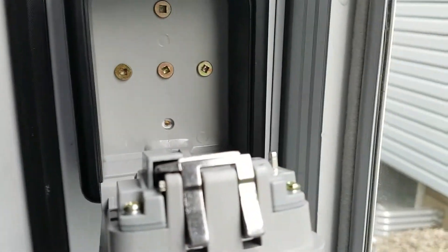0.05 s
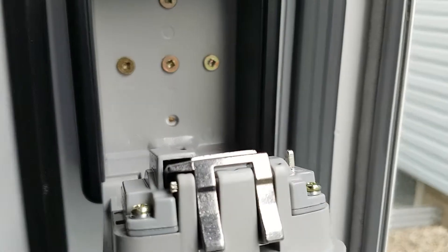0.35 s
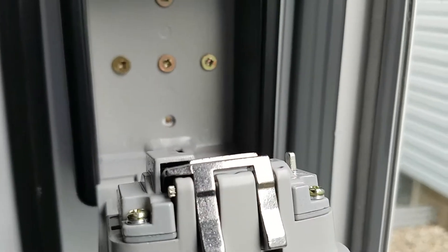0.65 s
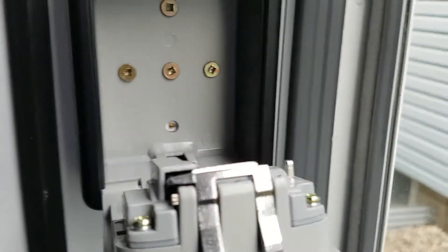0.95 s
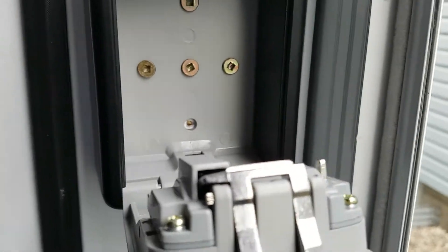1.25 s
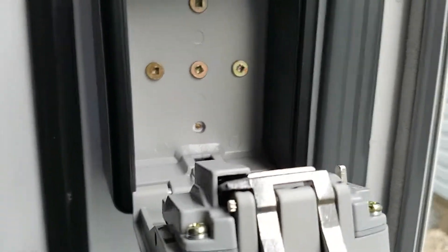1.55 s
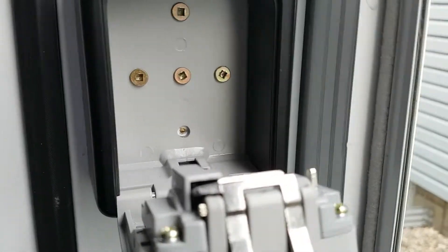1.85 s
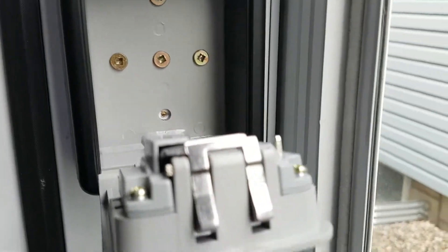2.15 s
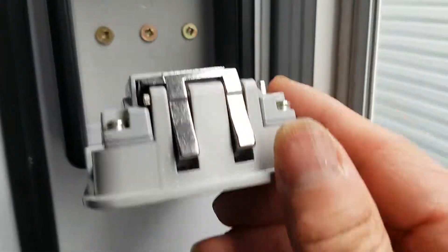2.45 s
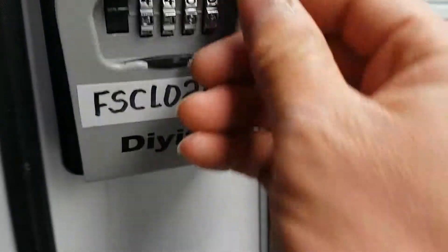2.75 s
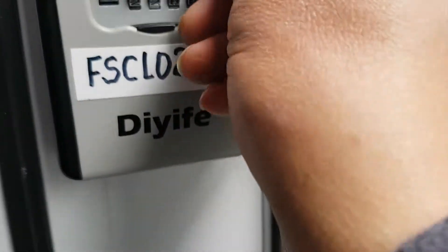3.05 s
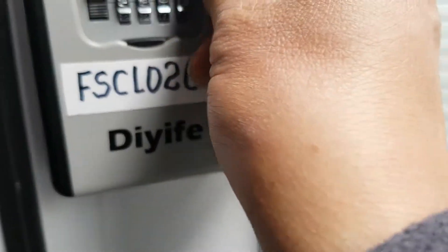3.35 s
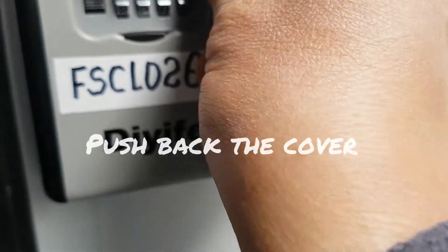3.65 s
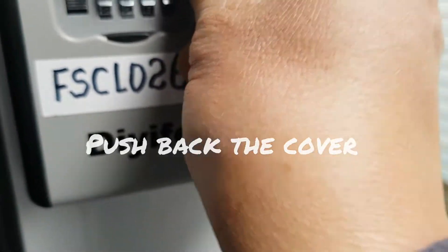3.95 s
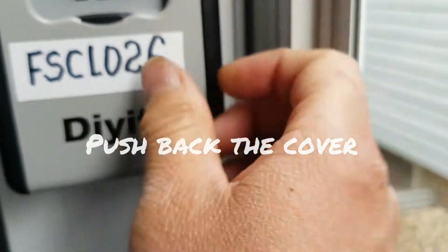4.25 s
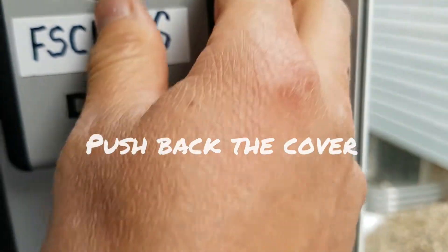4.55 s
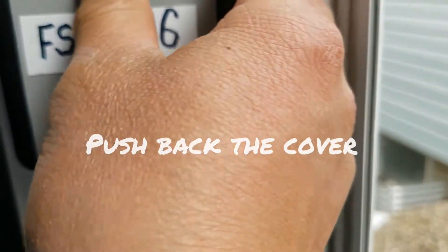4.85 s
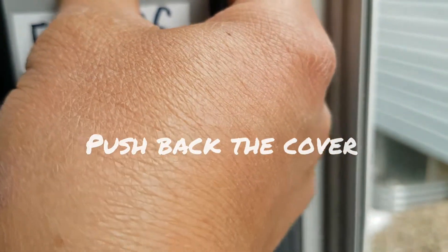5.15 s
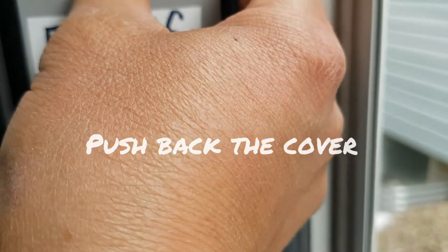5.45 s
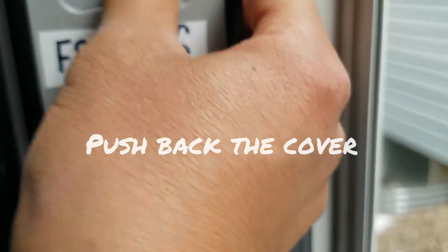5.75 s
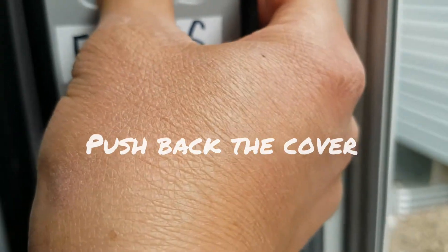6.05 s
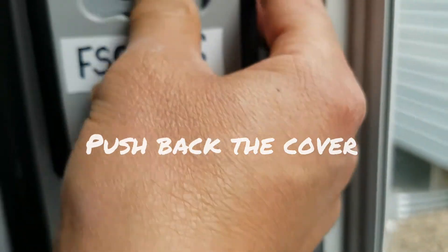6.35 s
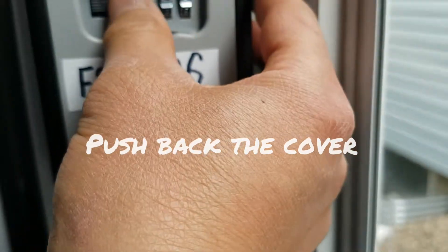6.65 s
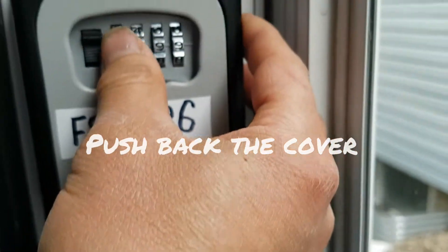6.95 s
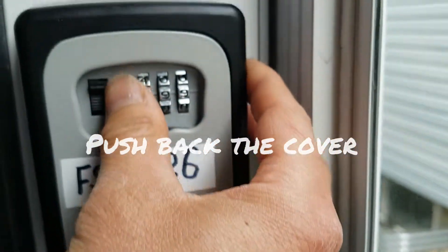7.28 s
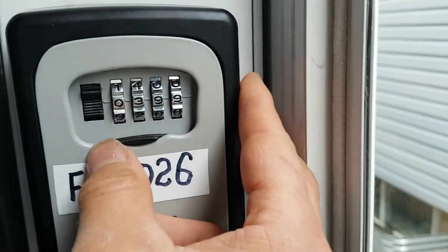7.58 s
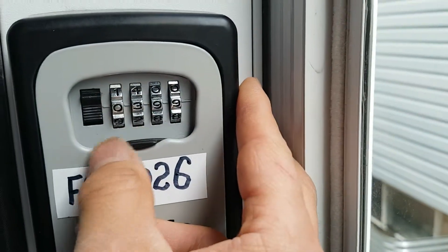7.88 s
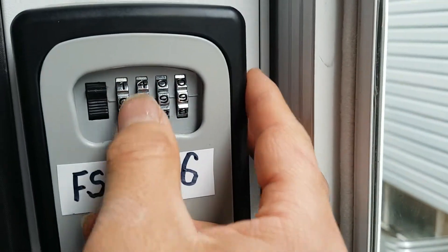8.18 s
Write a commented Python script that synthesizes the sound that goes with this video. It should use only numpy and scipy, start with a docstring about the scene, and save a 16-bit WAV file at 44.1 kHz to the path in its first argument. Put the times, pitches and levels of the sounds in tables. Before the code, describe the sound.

Light knocks and thin hinge squeaks lead to a metal lockbox lid snapping shut, followed by small, uneven dial clicks.

```python
"""You hear the lid of a small metal key safe squeak open and snap shut, then a number dial click round.
The dry hinge sticks and slips. Each contact of lid or dial is a quick chatter of tiny impacts that
makes the metal ring, and the room echoes it. The lid shuts with a low boom. Close by, skin rubs, a sleeve
rustles and a finger bumps the camera, over a low rumble. A few faint whistles come and go."""
import sys
import numpy as np
from scipy import signal
from scipy.fft import rfft, irfft
from scipy.io import wavfile

SR = 44100
rng = np.random.default_rng(int(sys.argv[2]) if len(sys.argv) > 2 else 0)


def generate_wav(sig):
    """Save sig (samples, or channels by samples) to the path in sys.argv[1] as 16-bit PCM at SR."""
    pcm = np.round(np.clip(np.atleast_2d(sig).T, -1, 1) * 32767).astype(np.int16)
    wavfile.write(sys.argv[1], SR, pcm)


N = 362502
TIME = np.arange(N) / SR
TOP_HZ = 15950  # upper edge of the sound

# Low thuds: soft bumps on the camera, and a low boom as the lid snaps shut.
# (time [s], level [dB], push length [s], wobble pitch [Hz], wobble fade time [s])
# A fade time, here and below, is the time to drop by 60 dB.
LOW_THUDS = [(1.496, -35, 0.005, 123, 0.086), (2.745, -38, 0.0088, 84, .1), (2.799, -38, 0.014, 55, 0.073),
             (3.287, -37, 0.0098, 73.7, 0.088), (3.548, -37, 0.01, 65.6, 0.59),
             (4.2752, -25.5, 0.0043, 76.4, 0.22), (4.312, -28, 0.01, 70, 0.21),
             (4.353, -26, 0.0044, 100, 0.032), (4.412, -30, 0.0054, 104, 0.095),
             (4.488, -36.5, 0.0055, 69.4, 0.3), (4.57, -41.5, 0.0042, 102, 0.16)]
# How alike left and right are for sound from all around: (frequency [Hz], likeness [1 = the same])
AIR_LIKENESS_CURVE = [(60, 0.92), (130, 1), (290, 0.97), (640, 0.55), (1410, 0.23), (3100, 0.0039),
                      (6820, -0.03), (15000, -0.015)]


def amp(db):
    """Turns decibels into a number to multiply by."""
    return 10 ** (np.asarray(db) / 20)


def unit(x):
    """Scales a signal to an average power of 1."""
    return x / np.sqrt(np.mean(x ** 2) + 1e-20)


def per_blow(x):
    """Scales a stereo sound to the energy of 10 ms at power 1."""
    return x / np.sqrt(np.sum(x ** 2) / len(x) / (.01 * SR) + 1e-20)


def read(points, hz):
    """Reads between (frequency [Hz], value) points, with octaves evenly spaced."""
    f, value = np.transpose(points)
    return np.interp(np.log(hz + 1), np.log(f + 1), value)


def add(mix, s, sound):
    """Mixes a sound in, starting at s seconds."""
    part = mix[:, max(round(s * SR), 0):][:, :sound.shape[1]]
    part += sound[:, :part.shape[1]]


def colour(x, points):
    """Shapes the tone with a (frequency [Hz], level [dB]) curve."""
    size = x.shape[-1]
    return irfft(rfft(x) * amp(read(points, np.fft.rfftfreq(size, 1 / SR))), size)


def pair(x, likeness):
    """Makes two unrelated channels alike in the low notes, where the waves are long."""
    size = x.shape[-1]
    left, other = rfft(x)
    same = np.clip(read(likeness, np.fft.rfftfreq(size, 1 / SR)), -1, 1)
    return irfft(np.array([left, same * left + np.sqrt(1 - same ** 2) * other]), size)


def drift(per_s):
    """A random wavering, with up to about per_s ups and downs a second."""
    knots = np.arange(0, TIME[-1] + 1, .5 / per_s)
    return unit(np.interp(TIME, knots, rng.standard_normal(4096)[:len(knots)]))


def movement(shake_db=-15, shake_fade_s=.9):
    """Levels of rumble, rub and sleeve: each move swells and fades, each thud stirs up the rumble."""
    # noise between moves: (time [s], rub level [dB], sleeve level [dB])
    quiet = [(0, -62, -66.5), (2.5, -65, -63.5), (3.45, -60.5, -68.5), (5.3, -62, -69.5), (6.0, -64, -71.5),
             (6.8, -64, -72.5), (8.2, -62.5, -73)]
    # rumble at rest: (time [s], level [dB])
    resting_rumble = [(0, -55.5), (2.0, -56), (5.2, -53.5), (6.8, -56), (8.2, -55)]
    # moves of hand and arm: (peak time [s], half length [s], rub level [dB], sleeve level [dB])
    moves = [(0.035, 0.21, -59, -59.5), (0.464, 0.29, -59, -59), (0.807, 0.1, -55.5, -53.5),
             (1.03, 0.07, -55, -56), (1.228, 0.12, -56, -57), (1.503, .14, -50.5, -51),
             (1.906, 0.25, -55.5, -54), (2.149, 0.24, -55.5, -52), (2.326, 0.2, -57, -63),
             (2.87, 0.31, -57.5, -57.5), (4.199, 0.16, -56, -55.5), (4.498, 0.3, -62.5, -64.5),
             (4.992, 0.16, -67, -64)]
    times, *levels = np.transpose(quiet)
    rub, sleeve = (amp(np.interp(TIME, times, db)) ** 2 for db in levels)  # noises add as powers
    rumble = amp(np.interp(TIME, *np.transpose(resting_rumble))) ** 2
    for s, half_length, rub_db, sleeve_db in moves:
        swell = np.exp(-2 * ((TIME - s) / half_length) ** 2)
        rub += amp(rub_db) ** 2 * swell
        sleeve += amp(sleeve_db) ** 2 * swell
    for s, db, *_ in LOW_THUDS:
        rumble += (TIME > s) * amp(db + shake_db - 60 * abs(TIME - s) / shake_fade_s) ** 2
    return np.sqrt([rumble, rub, sleeve])


def rumble_and_rustle():
    """A low rumble, skin rubbing on the case and the grainy hiss of a sleeve."""
    # tone of each noise: (frequency [Hz], relative level [dB])
    rumble_tone = [(15, -50), (25, -13), (59, -10), (76, -3), (96, -2), (137, 1), (171, -12), (197, -8.5),
                   (227, -15.5), (420, -26), (550, -52), (920, -120)]
    rub_tone = [(150, -34.5), (250, 1.5), (391, -7.5), (443, -5), (508, -9.5), (914, -7), (1000, -10),
                (1260, -9), (2780, -12.5), (3960, -21.5), (6390, -31), (7230, -31.5), (10000, -39.5),
                (13000, -31.5), (22000, -120)]
    sleeve_tone = [(1500, -9), (3500, -6), (5500, -4.5), (7500, -9), (9500, -9), (11500, -3), (14000, -2.5),
                   (16000, -2.5)]
    rumble_level, rub_level, sleeve_level = movement()
    low, mid, high = (pair(rng.standard_normal((2, N)), AIR_LIKENESS_CURVE) for _ in range(3))
    rumble = unit(colour(low, rumble_tone)) * rumble_level * amp(1.5 * drift(12)) * amp([[-.6], [.6]])
    rub = unit(colour(mid, rub_tone)) * rub_level * amp(drift(40))
    fibres = high * np.exp(.35 * rng.standard_normal(N))
    sleeve = unit(colour(fibres, sleeve_tone)) * sleeve_level * amp(.9 * drift(54))
    return rumble + rub + sleeve * amp([[1.8], [-2.2]])  # the sleeve is a little to the left


def chatter(t, length, rise_s, release_s, grit):
    """Tiny impacts as two parts slide into place; more grit makes their sizes more uneven."""
    # how alike left and right are for sound straight from the box: (frequency [Hz], likeness [1 = same])
    box_likeness = [(200, 0.96), (700, 1), (1300, 0.97), (2500, 0.094), (15000, 0.029)]
    pressure = (1 - np.exp(-t / rise_s)) * np.exp(-np.maximum(t - length, 0) / release_s)
    impacts = rng.standard_normal((2, len(t))) * np.exp(grit * rng.standard_normal(len(t)))
    impacts = pair(impacts, box_likeness) * pressure
    even = irfft(np.exp(1j * np.angle(rfft(impacts))))  # every frequency equally strong
    return per_blow(even * np.sqrt(pressure))


def hinge(width_hz=200, scrape_db=-4, linger_db=-22, linger_width_hz=22):
    """The dry hinge sticks and slips, ringing one very high note with a puff of scraping noise."""
    # catches of the hinge: (time [s], length [s], pitch [Hz], relative level [dB])
    squeaks = [(0.016, 0.0075, 13840, -39), (0.543, 0.0046, 13400, -48), (1.007, 0.0032, 13400, -45.5),
               (1.032, 0.007, 13800, -46.5), (1.233, 0.0025, 13600, -48.5), (1.578, 0.019, 12100, -34.5),
               (1.746, 0.0073, 13200, -45), (1.938, 0.0059, 13140, -36.5), (2.053, 0.016, 13800, -44),
               (2.103, 0.021, 13400, -34.5), (2.13, 0.013, 13600, -31), (2.15, 0.0049, 13500, -39)]
    out, t = np.zeros((2, N)), np.arange(4096) / SR
    for s, length, hz, db in squeaks:
        slips = chatter(t, length, rise_s=0.0012, release_s=0.0013, grit=0.65)
        decay = np.exp(-np.pi * width_hz * t) + amp(linger_db) * np.exp(-np.pi * linger_width_hz * t)
        note = decay * np.sin(2 * np.pi * hz * t)
        squeal = per_blow(signal.fftconvolve(slips, note[None], axes=1)[:, :len(t)])
        scrape = per_blow(band(slips, 12940, 14100, order=1))
        add(out, s, amp(db) * (squeal + amp(scrape_db) * scrape))
    return out * amp([[2.6], [-7.5]])  # louder on the left


def band(x, lo_hz, hi_hz, order=3):
    """Keeps the frequencies between lo_hz and hi_hz."""
    return signal.sosfilt(signal.butter(order, (lo_hz, hi_hz), "band", fs=SR, output="sos"), x)


def room(x, build_s=0.004):
    """Echoes from the walls blur into a tail whose highest notes die first."""
    # how long the room rings: (frequency [Hz], fade time [s])
    fade_times = [(200, 0.5), (700, 1.13), (2000, 0.65), (5000, 0.74), (9000, 0.67), (15500, 0.18)]
    # tone of the echo: (frequency [Hz], relative level [dB])
    echo_tone = [(200, 8), (700, -4), (2000, 0), (5000, -2.5), (9000, -6), (15500, -3.5)]
    hz, t, spectrum = signal.stft(rng.standard_normal((2, SR + SR // 4)), SR, nperseg=256)
    spectrum *= amp(read(echo_tone, hz)[:, None] - 60 * t / read(fade_times, hz)[:, None])
    tail = pair(signal.istft(spectrum, SR, nperseg=256)[1], AIR_LIKENESS_CURVE)
    tail *= 1 - np.exp(-TIME[:tail.shape[1]] / build_s)
    return signal.fftconvolve(x, tail / np.linalg.norm(tail[0]), axes=1)[:, :N]


def ring(force, notes, spot, extra_width_hz, between_db):
    """A force rings a part's own notes (wider ones die sooner); the struck spot boosts some pitches."""
    size = force.shape[1]
    f = np.fft.rfftfreq(size, 1 / SR)
    hz, width, db = np.transpose(notes)[:, :, None]
    width = width + extra_width_hz * (1 + hz / 2500)  # the hand damps high notes most
    peaks = amp(db) ** 2 / (1 + (2 * (f - hz) / width) ** 2)
    power = amp(between_db) ** 2 + peaks.sum(0)
    for spot_hz, sharpness, lift_db in spot:
        boost = np.interp(spot_hz, f, power) * amp(lift_db) ** 2
        power += boost / (1 + (2 * sharpness * (f / spot_hz - 1)) ** 2)
    cepstrum = irfft(np.log(power)) * (np.arange(size) < size // 2)  # puts the ring after the blow
    return irfft(rfft(force) * np.exp(rfft(cepstrum)))


def knocks(contacts, notes, extra_width_hz, low_db, high_db, between_db, settle_db, rise_s, hard_hz):
    """Each contact is a chatter that rings its part, with its own mix of thud, body, clack and click."""
    # ranges of thud, body, clack and click: (low edge [Hz], high edge [Hz])
    ranges = [(160, 500), (500, 1100), (1100, 3500), (3500, 16000)]
    # how much louder the box is on the left: (frequency [Hz], left minus right [dB])
    box_lean = [(200, 0.5), (400, -1.5), (700, -4), (1100, 4.5), (2300, 7.5), (4400, 3), (15000, 1)]
    lean = np.array(box_lean)
    out, t = np.zeros((2, N)), np.arange(4096) / SR
    for s, length, db, thud_db, clack_db, click_db, low_hz, high_hz in contacts:
        strike = chatter(t, length, rise_s, release_s=0.0029, grit=0.27)
        settle = chatter(t, length, rise_s=0.013, release_s=0.012, grit=0.76)  # loose parts settle
        spot = [(low_hz, 13, low_db), (high_hz, 16, high_db)]
        ringing = ring(strike + amp(settle_db) * settle, notes, spot, extra_width_hz, between_db)
        reach_hz = min(hard_hz * 2 ** (click_db / 29), TOP_HZ)  # harder contacts reach higher
        ringing = band(ringing, 100, reach_hz, order=2)
        shares = zip((thud_db, 0, clack_db, click_db), ranges)
        blow = sum(amp(db + share) * per_blow(band(ringing, *edges)) for share, edges in shares)
        add(out, s, np.array([colour(blow[0], lean * [1, .5]), colour(blow[1], lean * [1, -.5])]))
    return out


def lid():
    """The lid and its latch knock against the box, ringing it and its wall plate."""
    # contacts: (time [s], chatter length [s], body level [dB], thud, clack and click [dB above body],
    # low and high note of the struck spot [Hz])
    contacts = [(0.438, 0.014, -50, -2.5, -3, -3, 300, 11090),
                (1.201, 0.0077, -54, 5.5, 8, -13, 1260, 2250),
                (1.351, 0.026, -48.5, -3, 0.5, -7, 1440, 2340), (1.388, 0.009, -54, 8, 0, 9.5, 430, 4270),
                (1.44, 0.037, -45.5, -0.5, 0, -4.5, 400, 11670),
                (1.487, 0.029, -57, 8.5, 4, 10, 460, 12400), (1.583, 0.019, -58, 5.5, 14, 13, 2300, 6750),
                (2.132, 0.019, -69.5, -3, 21, 19, 2040, 11200),
                (2.417, 0.015, -58, 18.5, -17, -10, 250, 344), (2.44, 0.008, -46, -2, -10, -20, 237, 668),
                (2.697, 0.012, -40, -3, -9, -18.5, 330, 730),
                (2.726, 0.036, -49, 7.5, -7.5, -21.5, 242, 883),
                (2.97, 0.011, -34, -4.5, 2.5, -2, 1263, 7950),
                (3.391, 0.0085, -48.5, -1, -23, -24.5, 510, 711),
                (3.5321, 0.0084, -29, -17, 5.5, -7.5, 800, 2560),
                (3.5368, 0.008, -18, -15.5, -3, -2.5, 790, 1780),
                (3.97, 0.0057, -30, -6, -3.5, -15, 692, 2030), (4.021, 0.0027, -55.5, 5, -5, -9, 330, 2380),
                (4.212, 0.024, -47.5, 0, -3, -6, 460, 2340)]
    # notes of the box, then of the plate and damped latch: (pitch [Hz], width [Hz], relative level [dB])
    box_notes = [(712, 140, -3.5), (1838, 46, -7.5), (2396, 52, -8.5), (2744, 110, -10), (3006, 140, -26),
                 (4190, 48, -34.5), (4700, 78, -14), (5580, 35, -16.5), (6260, 67, -14.5),
                 (6700, 69, -13.5), (7800, 84, -31), (8080, 59, -13.5)]
    plate_notes = [(266, 32, -8.5), (322, 76, -3.5), (660, 29, -5), (895, 63, 1.5), (1090, 42, -10),
                   (1256, 120, -17.5), (1572, 180, -8), (1828, 44, -8.5), (3257, 120, -24),
                   (4300, 700, -17.5), (11700, 980, -18.5), (14700, 690, -16)]
    return knocks(contacts, list(box_notes) + list(plate_notes), extra_width_hz=17, low_db=15.5,
                  high_db=9.5, between_db=-33, settle_db=-14, rise_s=0.00021, hard_hz=15220)


def low_thuds():
    """Soft bumps on the camera and a low boom as the lid shuts: each is a push, then a fading wobble."""
    out, t = np.zeros((2, N)), TIME[:SR // 2]
    for s, db, length, hz, fade_s in LOW_THUDS:
        from_peak = (t - length) / (0.41 * length)
        push = (1 - 2 * from_peak ** 2) * np.exp(-from_peak ** 2)
        wobble = .5 * amp(-60 * t / fade_s) * np.sin(2 * np.pi * hz * t) * (1 - np.exp(-t / 0.0063))
        add(out, s, amp(db) * (push + wobble) * np.ones((2, 1)))
    return out


def whistles(width_hz=100):
    """Faint, fuzzy tones that swell, glide and fade."""
    # thin whistles, and the 1.4 kHz ring lingering around the click at 2.97 s: (time [s], length [s], first
    # pitch [Hz], last pitch [Hz], level [dB])
    glides = [(2.84, 0.51, 2920, 2810, -60.5), (2.93, 0.223, 1436, 1390, -54),
              (4.287, 0.13, 1955, 1880, -58.5), (3.14, 0.12, 15700, 14450, -66),
              (6.995, 0.11, 3030, 3300, -68.5), (7.508, 0.107, 3200, 2840, -65.5),
              (7.866, .12, 2940, 3230, -72)]
    out = np.zeros((2, N))
    for s, length, first_hz, last_hz, db in glides:
        size = int(length * SR)
        turns = np.cumsum(np.linspace(first_hz, last_hz, size)) / SR
        a, b = rng.standard_normal((2, 2, SR))[..., :size]
        fuzz = signal.sosfilt(signal.butter(2, width_hz, fs=SR, output="sos"), a + 1j * b)
        tone = unit((fuzz * np.exp(2j * np.pi * turns)).real)  # slow noise moved up to the pitch
        add(out, s, amp(db) * tone * signal.windows.tukey(size, .7))
    return out


def singing_metal(blows):
    """A few barely damped notes of the metal ring on after a blow."""
    # lasting notes: (pitch [Hz], relative level [dB], fade time [s])
    notes = [(517, -33, .5), (811, -49, .5), (1812, -50, .9), (3037, -19, .72), (8140, -48, .45)]
    t = TIME[:SR]
    tail = sum(amp(db - 33.5 - 60 * t / fade_s) * np.sin(2 * np.pi * hz * t) for hz, db, fade_s in notes)
    return signal.fftconvolve(blows, tail[None], axes=1)[:, :N]


def dial():
    """A thumb turns the dial, and each step rings the dial and its spindle."""
    # steps: (time [s], chatter length [s], body level [dB], thud, clack and click [dB above body],
    # low and high note of the struck spot [Hz])
    steps = [(5.574, 0.037, -46.5, -5.5, -5.5, -9, 1180, 5800),
             (5.631, 0.009, -47.5, -13, 2.5, -7, 1300, 3060),
             (5.734, 0.0096, -40.5, -2, -7, -14, 347, 2644), (5.93, 0.0053, -55, -12, -2, -15, 715, 2520),
             (5.958, 0.0052, -56.5, -2, -7, -23, 716, 2450),
             (6.028, 0.0048, -59, 0.5, -0.5, -13, 350, 2810),
             (6.164, 0.025, -45, -1.5, -4.5, -7.5, 377, 5700),
             (6.2, 0.0051, -38.5, -9.5, -1, -5.5, 1330, 6240), (6.294, 0.012, -42, -4, -11, -21, 600, 2340),
             (6.315, 0.0088, -37.5, -2.5, -8, -14.5, 770, 2620),
             (6.592, 0.0053, -54.5, -7, -17, -26, 870, 2300), (6.96, 0.018, -54, 1, -9.5, -17.5, 299, 2340),
             (7.106, 0.0063, -37.5, -8.5, -8.5, -21, 755, 2410),
             (7.117, 0.0075, -47.5, -6.5, -2, -10, 774, 1370),
             (7.228, 0.0047, -56.5, -3, 1, -17, 980, 2260), (7.279, 0.017, -45, -3.5, -14, -25, 710, 2300),
             (7.302, 0.016, -49, 2, -3.5, -12, 390, 2540), (7.361, 0.004, -49, -7, 3, -4, 3070, 4730),
             (7.459, 0.0091, -41.5, -2.5, -10, -13.5, 680, 2000)]
    # notes of dial and spindle: (pitch [Hz], width [Hz], relative level [dB])
    notes = [(314, 60, -11.5), (442, 27, -9.5), (647, 71, -9.5), (790, 85, -3.5), (1470, 350, -5.5),
             (1960, 230, -3.5), (2380, 270, -6.5), (3020, 72, -6), (4930, 270, -9), (5500, 340, -16),
             (6400, 390, -9.5), (8300, 250, -22), (14200, 2600, -15)]
    return knocks(steps, notes, extra_width_hz=10, low_db=9.5, high_db=8, between_db=-22,
                  settle_db=-5.5, rise_s=0.00011, hard_hz=11300)


def scene(shut_s=3.5):
    """The safe in its room, with the close-by noises; the metal sings only from the lid's closing on."""
    lid_knocks = lid()
    safe = lid_knocks + dial() + hinge()
    singing = singing_metal(lid_knocks * (TIME > shut_s))
    return safe + singing + amp(-11) * room(safe) + low_thuds() + whistles() + rumble_and_rustle()


def record(dry, left_lag_s=.00015):
    """Sound reaches the left microphone a little later, and the highest treble is cut off."""
    delay = np.exp(-2j * np.pi * np.fft.rfftfreq(2 * N, 1 / SR) * left_lag_s)
    left = irfft(rfft(dry[0], 2 * N) * delay)[:N]
    treble_cut = signal.firwin(511, TOP_HZ, window=("kaiser", 9), fs=SR)
    return signal.oaconvolve(np.array([left, dry[1]]), treble_cut[None], "same")


dry = scene()
out = record(dry)
generate_wav(out)
```